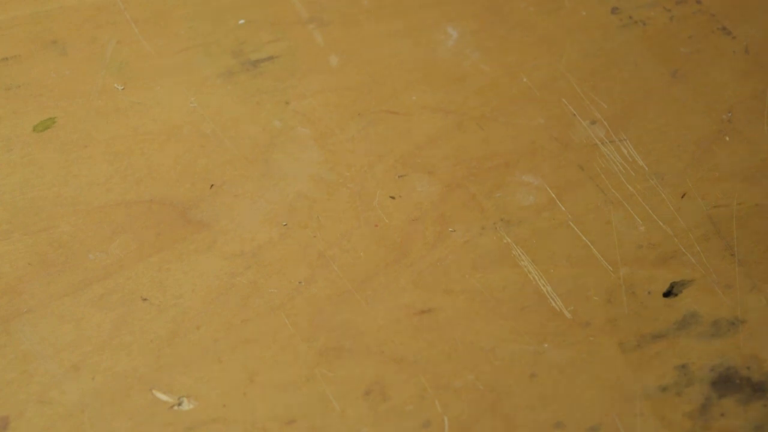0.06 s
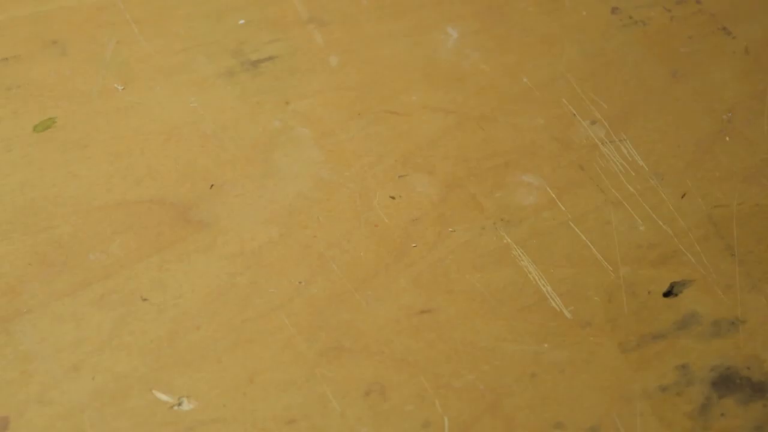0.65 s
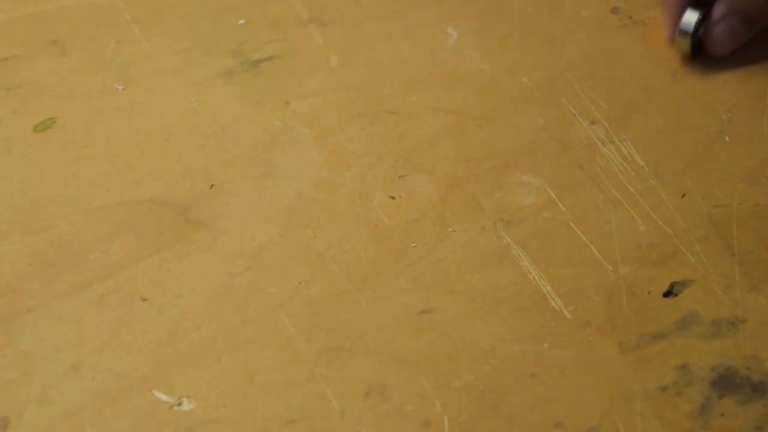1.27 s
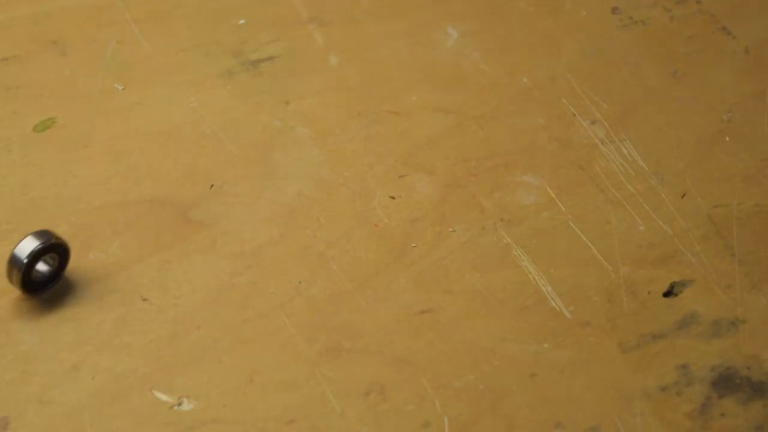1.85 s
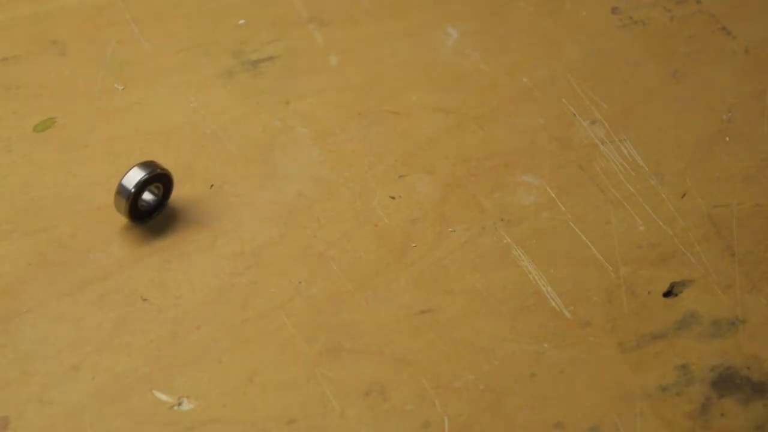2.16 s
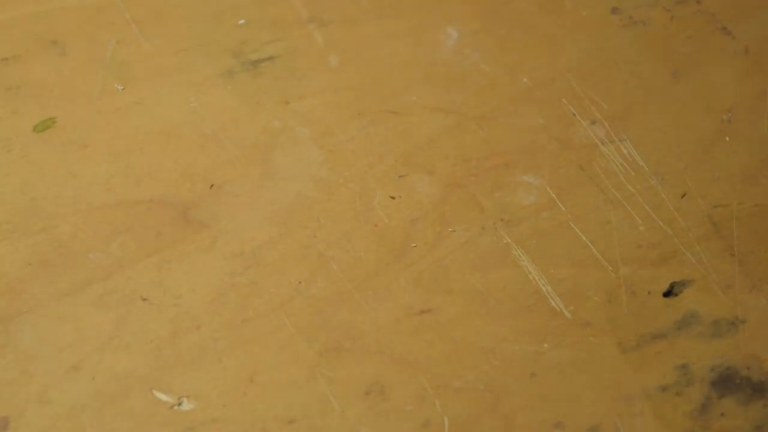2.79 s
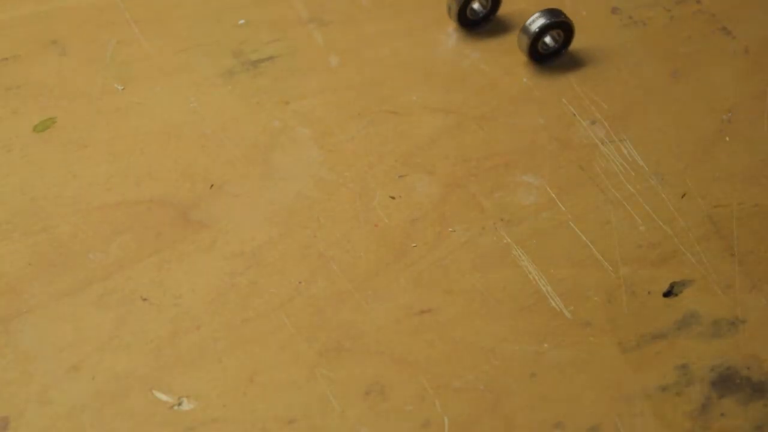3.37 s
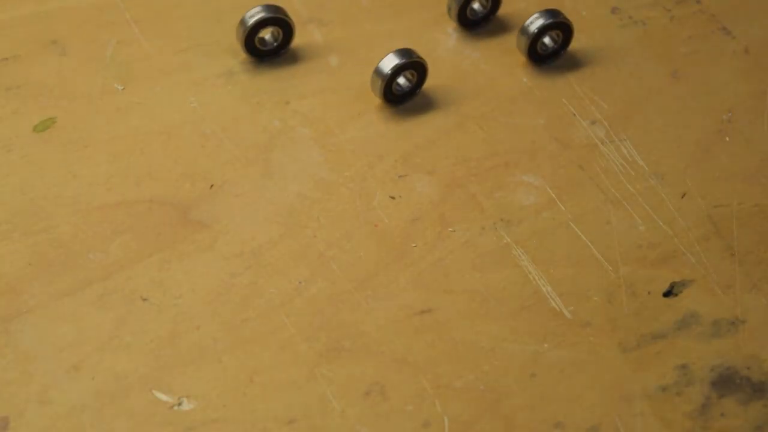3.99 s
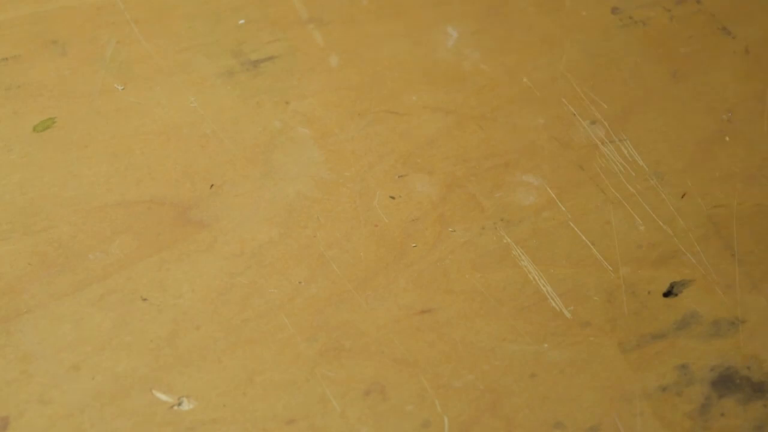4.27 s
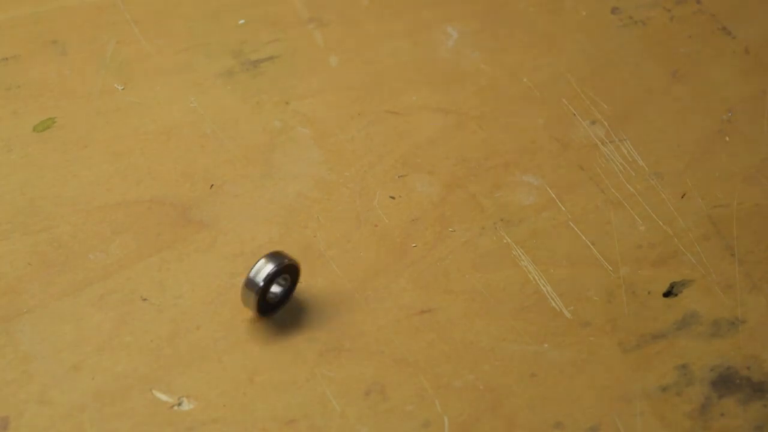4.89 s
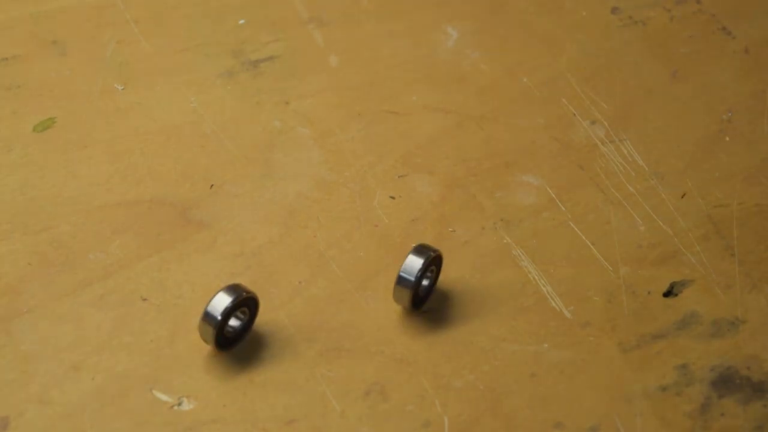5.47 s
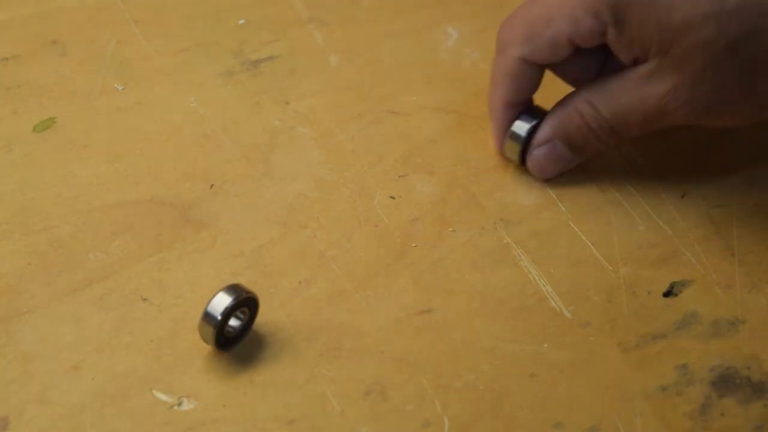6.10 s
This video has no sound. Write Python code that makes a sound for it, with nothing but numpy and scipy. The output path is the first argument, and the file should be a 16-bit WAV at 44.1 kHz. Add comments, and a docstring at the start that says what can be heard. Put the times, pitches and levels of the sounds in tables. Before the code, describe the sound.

Small steel bearings clack down and roll across a wooden bench, rattling and clicking over a faint, steady motor whine.

```python
"""Ball bearings on a workbench

Small steel ball bearings are set down on a wooden bench and sent rolling, one after another. Each lands with a
sharp, ringing clack; its balls rattle in the races and die down while the outer ring rumbles and whirs over the
wood, with short squeaks where it slips. Fingers knock and brush on the bench, and a small motor whines steadily
in the background of the quiet room."""
import sys
import numpy as np
from scipy import signal
from scipy.fft import rfft, irfft
from scipy.io import wavfile
from scipy.ndimage import uniform_filter1d, map_coordinates

SR = 44100
rng = np.random.default_rng(int(sys.argv[2]) if len(sys.argv) > 2 else 0)


def persist_wave(psi):
    """Save psi, clipped to +-1, as 16-bit WAV."""
    counts = np.round(np.clip(psi, -1, 1) * 32767).astype(np.int16)
    wavfile.write(sys.argv[1], SR, np.atleast_2d(counts).T)


N = 270774
HZ = np.fft.rfftfreq(4096, 1 / SR)  # frequency grid of the tone curves


def amp(db):
    """Decibels to gain."""
    return 10 ** (np.asarray(db) / 20)


def read(points, hz):
    """Reads a curve of (Hz, value) points on a log-frequency axis."""
    f, value = np.transpose(points)
    return np.interp(np.log(hz + 1), np.log(f + 1), value)


def add(mix, start, sound):
    """Mixes a sound in at start seconds."""
    part = mix[max(round(start * SR), 0):][:len(sound)]
    part += sound[:len(part)]


def unit(x):
    """Scales to rms 1."""
    return x / np.sqrt(np.mean(x ** 2) + 1e-20)


def unit_peak(x):
    """Scales so that the loudest two milliseconds have rms 1."""
    return x / np.sqrt(uniform_filter1d(x ** 2, 88, mode="constant").max() + 1e-20)


def colour(x, gain_db):
    """Minimum-phase EQ with the given gain on the grid HZ."""
    log_gain = np.log(amp(np.concatenate([gain_db, gain_db[-2:0:-1]])))
    taps = np.fft.ifft(np.exp(np.conj(signal.hilbert(log_gain)))).real
    return signal.fftconvolve(x, taps[:len(HZ)])[:len(x)]


def bell(hz, width_hz):
    """EQ bell of height 1, width_hz wide at half height."""
    return 0.5 ** ((2 * (HZ - hz) / width_hz) ** 2)


def tilt_db(db_per_octave):
    """Tilt around 5 kHz: a harder contact is brighter."""
    return db_per_octave * np.log2(np.maximum(HZ, 500) / 5000)


def resonate(x, hz, width_hz):
    """A resonance of gain 1 that follows the curve hz."""
    turn = np.exp(2j * np.pi * np.cumsum(hz) / SR)
    pole = np.exp(-np.pi * width_hz / SR)
    return 2 * (turn * signal.lfilter([1 - pole], [1, -pole], x / turn)).real


def drift(rate_hz):
    """Smooth random wander of rms 1."""
    f = np.fft.rfftfreq(N, 1 / SR)
    return unit(irfft(rfft(rng.standard_normal(N)) * np.exp(-(f / rate_hz) ** 2), N))


def burst(t, rise_s, decay_s):
    """Envelope of one contact, zero before t = 0."""
    t = np.maximum(t, 0)
    return (1 - np.exp(-t / rise_s)) * np.exp(-t / decay_s)


def chatter(size):
    """Random signs; played as sound, dense micro-impacts."""
    return rng.choice([-1., 1.], size)


# The room tone's colour. Each row: frequency in Hz, relative level in dB.
AIR_TONE = [(15, -64), (25, -44), (49, -43.5), (236, -27.5), (335, -22), (384, -19.5), (476, -14),
            (560, -19.5), (641, -13), (863, -16), (936, -13), (1070, -16), (3920, -19), (14400, -29),
            (16000, -34)]

def air(level_db=-52.8):
    """Even hiss of the quiet workshop."""
    shape = amp(read(AIR_TONE, np.fft.rfftfreq(N, 1 / SR)))
    return amp(level_db) * unit(irfft(rfft(rng.standard_normal(N)) * shape, N))


# The motor's tones. Each row: frequency in Hz, rms level in dB.
MOTOR_TONES = [(124, -86), (333.6, -68.5), (473.3, -52), (667.2, -78.5), (940.7, -54), (959.8, -56.5),
               (1421, -72.5), (1895, -70), (1997, -71), (3311, -70.5), (3784, -72.5), (4000, -71),
               (5927, -70.5), (7332, -70)]

def motor_whine(waver=0.0012, waver_hz=3, swell_db=0.9, swell_hz=1.8):
    """Steady motor tones that waver and swell a little; two close ones beat."""
    out = np.zeros(N)
    for hz, db in MOTOR_TONES:
        turns = np.cumsum(hz * (1 + waver * drift(waver_hz))) / SR + rng.random()
        out += amp(db + swell_db * drift(swell_hz)) * np.sqrt(2) * np.sin(2 * np.pi * turns)
    return out


# The workshop's reverb. Each row: frequency in Hz, seconds to fall 60 dB.
ROOM_DECAY = [(300, 0.32), (2000, 0.17), (8000, 0.077), (16000, 0.013)]

def room_tail(x, wet_db=-21, build_s=0.0031):
    """A weak, short tail whose treble dies first."""
    hz, t, bands = signal.stft(rng.standard_normal(SR // 2), SR, nperseg=256)
    decay = amp(-60 * t / read(ROOM_DECAY, hz)[:, None])
    tail = signal.istft(bands * decay, SR, nperseg=256)[1]
    tail *= 1 - np.exp(-np.arange(len(tail)) / SR / build_s)
    return amp(wet_db) * signal.fftconvolve(x, tail / np.linalg.norm(tail))[:N]


# Light strokes on the wood. Each row: start in seconds, length in seconds, level in dB.
BRUSH_CUES = [(0.246, 0.024, -48.5), (0.261, 0.053, -54), (0.684, 0.054, -52.5), (2.225, 0.04, -52.5),
              (2.485, 0.019, -55), (2.657, 0.1, -54.5), (3.952, 0.056, -47), (4.084, 0.051, -48)]
# Their colour. Each row: frequency in Hz, gain in dB.
BRUSH_TONE = [(1000, -12), (3000, 2.5), (5500, -3.5), (8000, -4), (10500, -5.5), (12000, 2.5), (14500, -1),
              (16000, -18)]

def brushes():
    """Faint hiss of skin or steel sliding on the bench."""
    out = np.zeros(N)
    for start, length, db in BRUSH_CUES:
        stroke = signal.windows.tukey(int(length * SR), .5)
        hiss = colour(rng.standard_normal(len(stroke)), read(BRUSH_TONE, HZ))
        add(out, start, amp(db) * stroke * unit(hiss))
    return out


# The bench top's modes. Each row: frequency in Hz, relative level in dB, seconds to fall 60 dB.
BENCH_MODES = [(495, -5.5, 0.014), (568, -4, 0.025), (770, -28, 0.013), (802, 0, 0.032), (934, -7.5, 0.02),
               (1070, -24, 0.014), (1303, -1, 0.045), (1530, -8.5, 0.032), (1758, 4, 0.024),
               (2480, -0.5, 0.021), (3000, 2, 0.019), (3700, 3, 0.011)]
# Dull knocks. Each row: start in seconds, level in dB, most excited frequency in Hz,
# roll-off either side of it in dB per octave.
KNOCK_CUES = [(0.0311, -24.5, 940, 13.5), (0.1345, -30, 1650, 15), (0.463, -33.5, 547, 5),
              (0.880, -44, 620, 16), (1.305, -41, 860, 10), (1.390, -41, 880, 17), (1.516, -36.5, 720, 13),
              (2.72, -36, 850, 18), (4.0864, -31.5, 600, 1), (4.099, -37, 636, 14), (4.176, -39.5, 880, 12),
              (4.305, -39, 616, 6), (4.444, -44, 1820, 14), (5.112, -42.5, 610, 22), (5.727, -33, 780, 7)]

def knocks(spot_spread_db=2.0):
    """Soft blows ring the bench top's modes; their signs and sizes depend on the spot struck."""
    out, t = np.zeros(N), np.arange(4096) / SR
    for start, db, centre_hz, rolloff in KNOCK_CUES:
        spot = chatter(len(BENCH_MODES)) * amp(spot_spread_db * rng.standard_normal(len(BENCH_MODES)))
        wood = np.zeros(len(t))
        for share, (hz, mode_db, t60) in zip(spot, BENCH_MODES):
            struck_db = mode_db - rolloff * abs(np.log2(hz / centre_hz))
            wood += share * amp(struck_db - 60 * t / t60) * np.sin(2 * np.pi * hz * t)
        add(out, start, amp(db) * unit_peak(wood))
    return out


# The voice of a bearing on the bench. Each row: resonance in Hz, width in Hz, lift in dB.
BEARING_MODES = [(1249, 124, 4.5), (2072, 184, 6), (2780, 280, 4.5), (3520, 190, 5), (4123, 284, 8),
                 (4420, 103, 9.5), (5350, 540, 6), (6120, 205, 9.5), (6613, 230, 11), (7120, 710, 10),
                 (7930, 220, 7), (8600, 620, 6.5), (10090, 760, 11.5), (11110, 380, 15.5),
                 (11620, 400, 13.5), (13440, 780, 13.5), (15170, 910, 6.5)]

def bearing_db(force_tone):
    """Tone curve of a contact force heard through the bearing's resonances."""
    return read(force_tone, HZ) + sum(db * bell(hz, width) for hz, width, db in BEARING_MODES)


def steel_ring(t, tone_db):
    """Free ringing of the bearing's modes after one hard contact at t = 0."""
    t = np.maximum(t, 0)
    out = np.zeros(len(t))
    for k, (hz, width, _) in enumerate(BEARING_MODES):
        gain = (-1) ** k * amp(np.interp(hz, HZ, tone_db)) * width
        out += gain * np.exp(-np.pi * width * t) * np.sin(2 * np.pi * hz * t)
    return out


# Colour of the light contacts in slips, clicks and rattle. Each row: frequency in Hz, gain in dB.
LIGHT_FORCE = [(200, -33), (600, -11), (2000, -1.5), (4000, 2.5), (6500, -1.5), (8500, -1), (10500, -4.5),
               (12500, -7), (14000, -9), (15500, -9), (16300, -29)]
# Tiny squeaks. Each row: start in seconds, level in dB, pitch in Hz, length in seconds.
SLIP_CUES = [(0.114, -43, 2900, 0.012), (0.1324, -31, 3340, 0.0047), (0.14, -28, 9300, 0.0041),
             (0.877, -41.5, 7200, 0.011), (1.072, -38.5, 4440, 0.013), (2.125, -46.5, 9800, 0.018),
             (2.828, -30.5, 7000, 0.0068), (3.079, -34.5, 5200, 0.0098), (3.323, -28.5, 6940, 0.0067),
             (3.324, -33.5, 3420, 0.017), (3.549, -41, 10800, 0.012), (4.146, -38.5, 4730, 0.02),
             (4.173, -39.5, 4500, 0.016), (4.219, -44, 4400, 0.0034), (4.248, -38, 4670, 0.0083),
             (4.271, -25, 4570, 0.0066), (4.279, -31.5, 10800, 0.0078), (4.339, -46, 4400, 0.028),
             (4.442, -31, 1860, 0.013), (4.442, -31.5, 3600, 0.008), (4.532, -41.5, 7100, 0.011),
             (5.724, -40, 4420, 0.0063)]

def slips(squeak_db=11, width_hz=900, rolloff_db_per_octave=3.5):
    """A ring sticks and slips on the wood or its neighbour, exciting one resonance above the rest."""
    out, t = np.zeros(N), np.arange(2048) / SR
    for start, db, hz, length in SLIP_CUES:
        force = np.sin(np.pi * np.minimum(t / length, 1)) * chatter(len(t))
        focus_db = squeak_db * bell(hz, width_hz) - rolloff_db_per_octave * abs(np.log2((HZ + 100) / hz))
        add(out, start, amp(db) * unit_peak(colour(force, bearing_db(LIGHT_FORCE) + focus_db)))
    return out


# Steel on steel. Each row: start in seconds, relative level in dB, brightness in dB per octave.
CLICK_CUES = [(0.6544, -25, 2), (0.8204, -27, 0), (0.9653, -14, 4), (0.973, -14.5, 1.5), (1.433, -14, 6),
              (1.6372, -13.5, 3), (1.79, -25.5, -1), (2.812, -17, 0.5), (2.912, -25, -3), (3.0752, -20, 3),
              (3.0898, -18, 3), (3.2021, -23, -2.5), (3.32, -17, 1), (3.3475, -24, 7), (3.3666, -23, -3),
              (3.3807, -22, 0), (3.4347, -31, 5), (3.482, -28.5, 2), (3.58, -26, -1), (3.608, -13.5, 2.5),
              (3.683, -19, 3), (3.709, -26, 4), (4.054, -24.5, -5), (4.1988, -20.5, 0), (4.2686, -14, 9),
              (4.572, -19, -3.5), (4.5766, -13, 6), (4.742, -20, -3), (4.7665, -20.5, 3), (4.8024, -23, 3),
              (4.8827, -29.5, 1), (5.2084, -22, 1), (5.4212, -20, -1), (5.448, -26, 0.1)]

def clicks(rise_s=0.000093, decay_s=0.0015, trim_db=-13.5):
    """A ball drops against its race, or two rings touch."""
    out, t = np.zeros(N), np.arange(2048) / SR
    for start, db, brightness in CLICK_CUES:
        force = burst(t, rise_s, decay_s) * chatter(len(t))
        click = colour(force, bearing_db(LIGHT_FORCE) + tilt_db(brightness))
        add(out, start, amp(db + trim_db) * unit_peak(click))
    return out


def board_echo(x, gain=0.25, delay_s=0.0006, growth=0.0006):
    """An echo within the board comes later as the ring moves on, so hollow peaks slide down in pitch."""
    n = np.arange(len(x))
    return x + gain * map_coordinates(x, [n - delay_s * SR - growth * n], order=3)


def ball_rattle(lost_db, modes_db, ticks_per_s=1300, drops_per_s=36, tick_s=0.0009):
    """Loose balls hit the races: dense small ticks, and now and then a harder drop."""
    n = len(lost_db)
    ticks = amp(2.8 * np.minimum(rng.exponential(1, SR), 3.5)) * (rng.random(SR) < ticks_per_s / SR)
    drops = amp(11 + 6 * rng.uniform(-0.88, 1, SR)) * (rng.random(SR) < drops_per_s / SR)
    hits = ticks[:n] * amp(-lost_db) + drops[:n] * amp(-0.76 * lost_db)  # drops outlast the ticks
    power = signal.lfilter([1], [1, -np.exp(-2 / (tick_s * SR))], hits ** 2)
    tick_power = np.mean(ticks ** 2) * tick_s * SR / 2
    force = np.sqrt(power / tick_power) * chatter(SR)[:n]
    tone_db = read(LIGHT_FORCE, HZ) + modes_db
    mean_db = 10 * np.log10(np.mean(amp(tone_db) ** 2))
    return board_echo(colour(force, tone_db - mean_db))


# Colour of steel rolling on wood. Each row: frequency in Hz, gain in dB.
ROLLING_FORCE = [(150, 5), (400, -29.5), (700, 3.5), (1500, -1), (2500, 5.5), (3800, 0.5), (4700, -13),
                 (6000, -5.5), (9000, -54), (16000, -86)]

def wood_rumble(track, lost_db, modes_db, fade_share=0.52):
    """The outer ring runs over the grain; the wood falls quiet more slowly than the balls."""
    rumble = board_echo(colour(track, read(ROLLING_FORCE, HZ) + modes_db))
    return amp(-fade_share * lost_db) * unit(rumble)


def ring_whir(track, lost_db, start_hz, sag_hz_per_s=4300, width_hz=1200, settle_s=0.11, fade_share=0.47):
    """The skid gives way to a narrower whir, which sinks as the ring slows."""
    t = np.arange(len(track)) / SR
    settled = 1 - np.exp(-(t / settle_s) ** 2)
    hz = start_hz - sag_hz_per_s * t
    whir = resonate(resonate(track, hz, width_hz), hz, width_hz)
    return settled * amp(-fade_share * lost_db) * unit(whir)


# How far a rolling bearing's resonances stand out. Each row: frequency in Hz, factor on their lift.
ROLL_EMPHASIS = [(1000, 1.3), (3500, 1.05), (6300, 0.75), (7200, 1.36), (10000, 0.88), (11500, 0.38),
                 (16000, 0.8)]
# Runs across the bench. Each row: start, length and rise in seconds, rattle fade in dB per second,
# relative levels of rattle, rumble and whir in dB, the whir's starting pitch in Hz.
ROLL_CUES = [(0.814, 0.074, 0.0055, 40, -54, -52.5, -58, 4800),
             (0.967, 0.12, 0.0039, 147, -39.5, -42, -45, 4700),
             (1.18, 0.15, 0.0035, 86, -42, -44.5, -40, 4830),
             (1.42, 0.098, 0.004, 108, -43, -44, -42, 4650),
             (1.542, 0.04, 0.0026, 62, -33.5, -52, -55, 4800),
             (1.595, 0.32, 0.04, 137, -34.5, -42, -39, 4740), (2.037, 0.24, 0.033, 30, -61, -58, -70, 4400),
             (2.637, 0.056, 0.006, 40, -67, -58, -65, 4400),
             (2.818, 0.21, 0.0086, 124, -44, -45, -48, 4940),
             (3.071, 0.22, 0.005, 93, -44, -48, -46.5, 5330),
             (3.319, 0.22, 0.003, 115, -39.5, -45, -45, 5060),
             (3.612, 0.32, 0.004, 115, -40.5, -45, -45.5, 5070),
             (4.499, 0.087, 0.0033, 20, -51, -48, -50, 4600),
             (4.659, 0.272, 0.0033, 115, -36.5, -42.5, -37.5, 4880),
             (5.028, 0.097, 0.073, 40, -66, -52.5, -65, 4400),
             (5.16, 0.23, 0.0025, 110, -41, -44, -42.5, 5060),
             (5.415, 0.3, 0.003, 112, -42, -46, -47.5, 4960)]

def rolls(rattle_trim_db=-0.84, rumble_trim_db=0.7, grain_db=3, detune=0.0087, stop_s=0.014):
    """A rolling bearing rattles, rumbles and whirs, fading as it slows; no two ring quite alike."""
    out = np.zeros(N)
    grain = rng.standard_normal(N) * amp(grain_db * drift(240))
    for start, length, rise_s, fade, rattle_db, rumble_db, whir_db, whir_hz in ROLL_CUES:
        t = np.arange(0, length + stop_s, 1 / SR)
        track = grain[round(start * SR):][:len(t)]
        contact = np.minimum(t / rise_s, 1) * np.clip((length + stop_s - t) / stop_s, 0, 1)
        lost_db = fade * np.maximum(t - rise_s, 0)
        detuned_db = sum(db * bell(hz * (1 + detune * rng.standard_normal()), width)
                         for hz, width, db in BEARING_MODES)
        modes_db = read(ROLL_EMPHASIS, HZ) * detuned_db
        rattle = amp(rattle_db + rattle_trim_db) * ball_rattle(lost_db, modes_db)
        rumble = amp(rumble_db + rumble_trim_db) * wood_rumble(track, lost_db, modes_db)
        whir = amp(whir_db) * ring_whir(track, lost_db, whir_hz)
        add(out, start, contact * (rattle + rumble + whir))
    return out


# Colour of a landing's blow. Each row: frequency in Hz, gain in dB.
LANDING_FORCE = [(100, -38), (300, -28), (500, -5.5), (1000, -3.5), (2000, 0.5), (3300, -5.5), (6000, 0),
                 (9000, -1), (11000, -2), (12500, -4), (15500, -4), (17000, -37)]
# The outer ring's own bending modes. Each row: frequency in Hz, width in Hz.
BENDING_MODES = [(4250, 1000), (10100, 170)]
# Landings. Each row: start in seconds, relative level in dB, brightness in dB per octave,
# lift of the bending modes in dB, rebound gain in dB, rebound delay in seconds.
CLACK_CUES = [(0.801, -12, 0.5, 2, -18, 0.0024), (1.173, -9.5, -0.5, 2, -3, 0.0042),
              (1.4166, -14.5, 0, 2.5, -14, 0.005), (1.5447, -21.5, 0, -1, -29, 0.0027),
              (4.4898, -13.5, -0.5, 9.5, -15, 0.0016), (4.6542, -11.5, 0.5, 4.5, 2, 0.00119),
              (5.1522, -12, 1, 1.5, -7, 0.0017), (5.41, -11.5, 1, 0, -12, 0.0022)]

def clacks(rise_s=0.00074, crunch_s=0.0008, board_s=0.0042, crunch_db=-5, board_db=-10, trim_db=-2.5):
    """One edge of the ring lands and the other follows; the balls crunch and the board shudders."""
    out, t = np.zeros(N), np.arange(4096) / SR
    bending = sum(bell(hz, width) for hz, width in BENDING_MODES)
    for start, db, brightness, lift_db, rebound_db, delay in CLACK_CUES:
        tone_db = bearing_db(LANDING_FORCE) + tilt_db(brightness) + lift_db * bending
        ring = steel_ring(t, tone_db) + amp(rebound_db) * steel_ring(t - delay, tone_db)
        envelope = burst(t, rise_s, crunch_s) + amp(board_db) * burst(t, rise_s, board_s)
        crunch = colour(envelope * chatter(len(t)), tone_db)
        clack = unit_peak(ring) + amp(crunch_db) * unit_peak(crunch)
        add(out, start, amp(db + trim_db) * unit_peak(clack))
    return out


def scene(low_cut_hz=390):
    """Everything on the bench, its room tail and the steady background."""
    bench = clacks() + clicks() + slips() + knocks() + rolls() + brushes()
    # a steep low cut thins the bass of the bench sounds
    bench = signal.sosfilt(signal.butter(4, low_cut_hz, "high", fs=SR, output="sos"), bench)
    return (bench + room_tail(bench) + motor_whine() + air())[None]


def record(dry):
    """A steep high cut at 16.3 kHz."""
    high_cut = signal.firwin(255, 16300, window=("kaiser", 9), fs=SR)
    return signal.oaconvolve(dry, high_cut[None], "same")


dry = scene()
out = record(dry)
persist_wave(out)
```